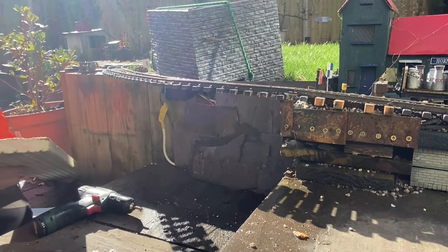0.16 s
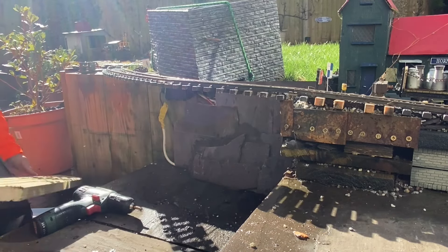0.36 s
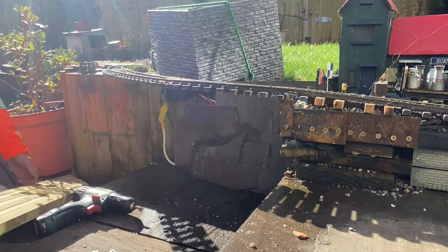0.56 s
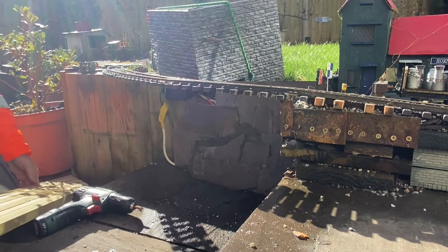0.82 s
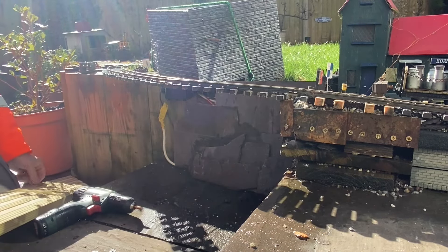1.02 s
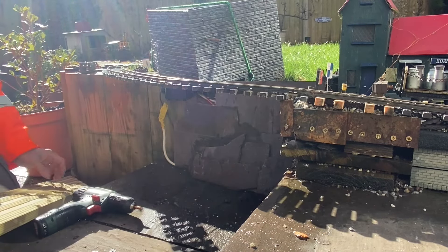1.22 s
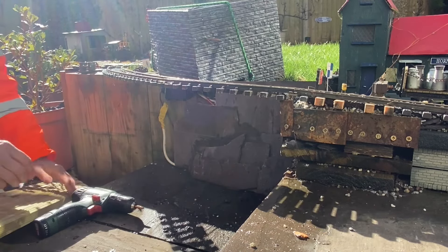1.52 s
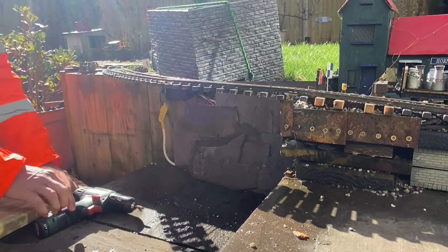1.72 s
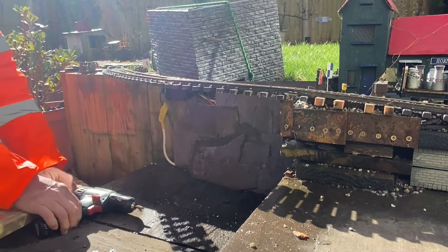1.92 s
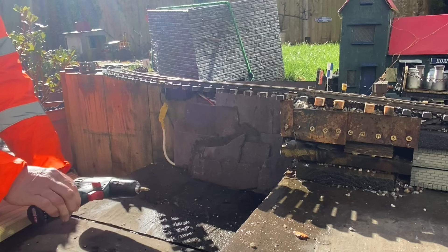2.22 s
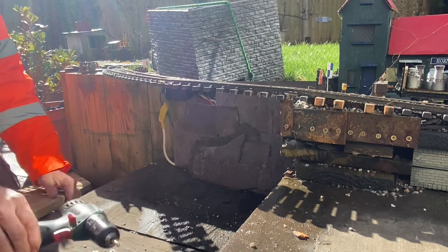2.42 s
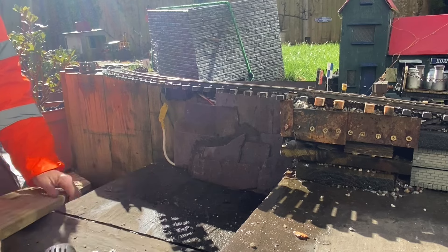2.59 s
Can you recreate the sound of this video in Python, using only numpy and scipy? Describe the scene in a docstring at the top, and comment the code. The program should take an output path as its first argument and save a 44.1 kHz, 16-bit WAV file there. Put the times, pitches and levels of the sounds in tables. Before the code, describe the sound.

Wooden boards clack and drop on garden decking, with sleeve rustle and a final heavy hollow knock

```python
"""On garden decking, timber boards are laid down and shifted, mostly to the left of the microphones.
Board edges clack, a lighter slat is tapped and a board drops and bounces: decaying sine waves plus short noise.
Soft bumps are low decaying sine waves; swishing sleeve, sliding wood, a rasp and rumble are filtered noise.
A heavy, hollow knock lands close by at the end. Echoes and a faint outdoor background are noise too."""
import sys
import numpy as np
from scipy import signal
from scipy.fft import rfft, irfft, next_fast_len
from scipy.io import wavfile
from scipy.ndimage import uniform_filter1d, minimum_filter1d

SR = 44100
rng = np.random.default_rng(int(sys.argv[2]) if len(sys.argv) > 2 else 0)


def waveform_to_disk(signal):
    """Save audio, clipped to [-1, 1], as 16-bit WAV at the path in sys.argv[1]."""
    frames = np.transpose(np.atleast_2d(signal))
    scaled = np.clip(frames, -1, 1) * 32767
    samples = np.round(scaled).astype(np.int16)
    wavfile.write(sys.argv[1], SR, samples)


N = 121275
T = np.arange(N) / SR

# sharp noise of rough wood faces meeting: (frequency [Hz], level [dB])
CRACK_SPECTRUM = [(200, -31), (600, 5.5), (1500, 12), (3500, 11), (7000, 4.5), (12000, -5.5), (15000, -22)]
# dull noise of wood meeting wood: (frequency [Hz], level [dB])
THUD_SPECTRUM = [(80, -3), (200, 9), (450, 10), (900, 3.5), (1500, 2), (2300, -9), (3500, -27),
                 (12000, -30)]
LAG_S = 0.00011  # how much later most wood sounds reach the right side


def amp(db):
    """Turn decibels into a gain."""
    return 10 ** (np.asarray(db) / 20)


def curve(rows):
    """Draw a gain over time through (time [s], level [dB]) points."""
    return amp(np.interp(T, *np.array(rows).T))


def colour(x, points):
    """Make each frequency louder or softer, following (frequency [Hz], level [dB]) points."""
    hz, db = np.array(points).T
    size = next_fast_len(N + SR // 10, True)
    f = np.maximum(np.fft.rfftfreq(size, 1 / SR), 1)
    gain = amp(np.interp(np.log(f), np.log(hz), db))
    return irfft(rfft(x, size) * gain, size)[..., :N]


def tilt(x, corner_hz, db_per_octave):
    """Brighten or dull the sound over three octaves above the corner; higher up the change stays level."""
    return colour(x, [(corner_hz, 0), (corner_hz * 2 ** 3, 3 * db_per_octave)])


def delay(x, s):
    """Start the same sound s seconds later."""
    k = int(np.clip(round(s * SR), 0, N - 1))
    return np.concatenate([np.zeros_like(x[..., :k]), x[..., :N - k]], axis=-1)


def place(x, pan_db, lag_s):
    """Place a sound in stereo: left is pan_db louder than right, and right hears it lag_s later."""
    return np.array([x * amp(pan_db / 2), delay(x, lag_s) * amp(-pan_db / 2)])


def noise(points, shared, pan_db=0, lag_s=0):
    """Make coloured stereo noise of average strength (rms) 1, partly common to both sides."""
    w = rng.standard_normal((3, N))
    common = np.sqrt(shared) * place(w[0], pan_db, lag_s)
    separate = np.sqrt(1 - shared) * w[1:]
    x = colour(common + separate, points)
    return x / np.std(x)


def fade(t, t60):
    """Die away by 60 dB in t60 seconds."""
    return np.exp(-np.log(1000) * t / t60)


def ring(hz, t60, rise_s):
    """Ring one mode, a natural vibration of the wood: a sine wave builds up and dies away."""
    t = T[:N // 4]
    y = np.sin(2 * np.pi * hz * t) * (1 - np.exp(-t / rise_s)) * fade(t, t60)
    return np.pad(y, (0, N - len(t)))


def burst(decay_s):
    """Shape the loudness of a short rough contact: a quick rise, then a fall."""
    rise_s = 0.0029
    return (1 - np.exp(-T / rise_s)) * np.exp(-np.minimum(T / decay_s, 20))


def blows(events, modes, pan_db, crack_db, thud_db):
    """Each blow rings the wood's modes while rough faces crack and thud; its brightness tilts the treble."""
    rise_s, thud_decay_s = 0.0046, 0.026
    body = 0
    for k, (hz, db, t60) in enumerate(modes):
        sign = (-1) ** k  # every second mode starts by swinging the other way
        body = body + sign * amp(db) * ring(hz, t60, rise_s)
    body = place(body, pan_db, LAG_S)
    crack = amp(crack_db) * noise(CRACK_SPECTRUM, shared=0.48, lag_s=LAG_S)
    thud = amp(thud_db) * noise(THUD_SPECTRUM, shared=0.38, pan_db=pan_db, lag_s=LAG_S)
    out = 0
    for s, db, brightness, scuff_s in events:
        hit = delay(body, s)
        hit = hit + thud * delay(burst(thud_decay_s), s)
        hit = hit + crack * delay(burst(scuff_s), s)
        out = out + amp(db) * tilt(hit, 700, brightness)
    return out


def edge_sounds(events, modes):
    """Clacks and taps share one balance: strong cracking noise beside the ringing wood."""
    return blows(events, modes, pan_db=2.5, crack_db=18.0, thud_db=-12.5)


def edge_clacks():
    """Board edges clack together, and the loose board rings."""
    # modes of a loose board: (frequency [Hz], level [dB], time to fall 60 dB [s])
    board_modes = [(655, 8.5, 0.057), (1110, 7.5, 0.082), (1466, 3, 0.066), (1890, -6, 0.048),
                   (2236, 6, 0.041), (2484, 9.5, 0.021), (2860, -0.5, 0.064), (3060, 5, 0.018),
                   (3890, 9, 0.053), (4200, -14, 0.024), (5830, 2, 0.053), (6830, 4.5, 0.028)]
    # clacks: (time [s], level [dB], brightness [dB per octave], decay of the scuffing noise [s])
    clacks = [(.031, -43.5, -6.5, 0.0042), (.038, -74.5, 8.5, 0.0029), (.173, -44, 2.5, 0.0021),
              (.1762, -39.5, 2.5, 0.0032), (.7395, -56, -3.5, 0.00071), (1.8712, -59.5, 7, 0.0021),
              (2.356, -45.5, -3, 0.0017), (2.3905, -59.5, 3, 0.0021)]
    return edge_sounds(clacks, board_modes)


def slat_taps():
    """A lighter slat is tapped and rings in its own modes."""
    # modes of the slat: (frequency [Hz], level [dB], time to fall 60 dB [s])
    slat_modes = [(647, 8, 0.064), (949, 4.5, 0.063), (1715, 13.5, 0.028), (2720, 10.5, 0.041),
                  (4750, 0, 0.059), (7700, 4, .02)]
    # taps: (time [s], level [dB], brightness [dB per octave], decay of the scuffing noise [s])
    taps = [(.3365, -49, 2, 0.0026), (2.3485, -43.5, -8.5, 0.011), (2.5188, -48.5, -5, 0.0028)]
    return edge_sounds(taps, slat_modes)


def board_landings():
    """A board meets the deck and rings as it lies there, with less cracking noise than the edges."""
    # modes of a board lying on the deck: (frequency [Hz], level [dB], time to fall 60 dB [s])
    lying_modes = [(476, 0, 0.056), (641, -1, 0.028), (773, -0.5, 0.036), (837, -7, 0.033),
                   (1519, -11.5, 0.061), (1980, -14.5, 0.03), (2530, -2.5, 0.025), (3060, -15, 0.021),
                   (3810, -9, 0.017)]
    # landings: (time [s], level [dB], brightness [dB per octave], decay of the scuffing noise [s])
    landings = [(.4875, -16.5, -2, 0.0046), (.5308, -28, -4, 0.0027), (1.482, -35.5, -4, 0.0015),
                (1.801, -38.5, -8, 0.014), (1.869, -40.5, -2, 0.0024)]
    return blows(landings, lying_modes, pan_db=5.5, crack_db=0.5, thud_db=-17.0)


def heavy_knock():
    """A blunt blow on the nearest plank: low bending waves arrive last and build slowly."""
    # modes of the near plank: (frequency [Hz], level [dB], time to fall 60 dB [s], left minus right [dB])
    plank_modes = [(185, -12.5, 0.076, 2.5), (244, -7, 0.04, 5), (385, -7.5, 0.059, 13.5),
                   (566, -7, 0.022, -12), (660, -5.5, 0.017, 30), (775, -1, 0.02, 6.5), (817, 1, 0.028, 16),
                   (1325, -14, 0.034, 9), (1470, -21.5, 0.023, -6), (2190, -24, 0.013, 5),
                   (3300, -51, 0.018, 2)]
    # the knock and its bounce: (time [s], level [dB], brightness [dB per octave])
    knocks = [(2.692, -3, 2), (2.7253, -20.5, -7)]
    bending_s = 0.0042  # travel time of a 1 kHz bending wave along the plank
    build_cycles, lag_cycles = 0.9, 0.16  # build-up time and lag of the right side, in cycles of each mode
    body = 0
    for hz, db, t60, pan_db in plank_modes:
        mode = place(ring(hz, t60, build_cycles / hz), pan_db, lag_cycles / hz)
        body = body + amp(db) * delay(mode, bending_s * np.sqrt(1000 / hz))
    thud = amp(-17.5) * noise(THUD_SPECTRUM, shared=0.23, pan_db=-7, lag_s=0.00026)
    crack = amp(-40.5) * noise(CRACK_SPECTRUM, shared=0)
    hit = body + delay((thud + crack) * burst(decay_s=0.0067), bending_s)
    return sum(amp(db) * tilt(delay(hit, s), 400, brightness) for s, db, brightness in knocks)


def bumps():
    """Soft pushes move the deck for a few slow cycles, each at its own pitch."""
    # pushes: (time [s], level [dB], pitch [Hz], time to fall 60 dB [s])
    pushes = [(0.033, -19.5, 256.4, 0.04), (0.149, -32.5, 73, 0.059), (0.498, -22.5, 115, 0.071),
              (0.534, -35.5, 330, 0.063), (0.562, -39, 94, 0.23), (0.686, -34, 87, 0.053),
              (0.726, -36.5, 170, 0.041), (1.171, -29.5, 82, 0.065), (1.292, -26.5, 106, 0.077),
              (1.482, -39, 70, 0.08), (1.488, -27, 175, 0.031), (1.497, -34.5, 354, 0.069),
              (1.854, -21.5, 171, 0.018), (2.226, -39.5, 78, 0.43), (2.287, -33, 133, 0.085),
              (2.358, -34, 76, 0.12), (2.361, -33, 161, 0.041), (2.398, -45, 109, 0.12),
              (2.465, -33.5, 114, 0.083), (2.492, -33.5, 76, 0.15)]
    x = sum(amp(db) * delay(ring(hz, t60, rise_s=0.0018), s) for s, db, hz, t60 in pushes)
    return place(x, 3, LAG_S)


def grain(size, depth_db):
    """Uneven grip: smoothed random noise makes the level flicker."""
    w = uniform_filter1d(uniform_filter1d(rng.standard_normal(N), size), size)
    return amp(depth_db * w / np.std(w))


def sleeve_swish():
    """Sleeve fabric swishes: filtered noise swells and fades with a fine flicker."""
    # sound of the fabric: (frequency [Hz], level [dB])
    fabric_spectrum = [(200, 4), (1100, 5.5), (2000, 1.5), (3200, 4.5), (5600, 4.5), (6800, 6), (9000, 2.5),
                       (12000, -2), (14000, -8), (15000, -43)]
    # loudness of the swish: (time [s], level [dB])
    swish_level = [(0, -57.5), (.11, -59), (.21, -51), (.32, -60), (.43, -58.5), (.53, -50.5), (.6, -63),
                   (1.05, -67), (1.22, -52.5), (1.38, -52.5), (1.5, -47), (1.65, -46.5), (1.8, -53),
                   (2.0, -57.5), (2.31, -65), (2.36, -52.5), (2.45, -57), (2.55, -53)]
    fabric = noise(fabric_spectrum, shared=0.27, lag_s=.00028)
    return fabric * curve(swish_level) * grain(size=200, depth_db=0.98)


def sliding_board():
    """A board slides under the hand: duller noise whose level flickers with the grip."""
    # sound of wood sliding on wood: (frequency [Hz], level [dB])
    slide_spectrum = [(100, 4), (350, 8.5), (1400, 9.5), (3000, -8.5), (6000, -46), (14000, -64)]
    # loudness of the sliding: (time [s], level [dB])
    slide_level = [(0, -56.5), (1.1, -60.5), (1.25, -55), (1.55, -62.5), (1.65, -46.5), (1.76, -53.5),
                   (1.83, -53.5), (1.95, -57.5), (2.4, -61), (2.54, -59.5), (2.75, -44)]
    wood = noise(slide_spectrum, shared=0.39, pan_db=1.5, lag_s=0.00035)
    return wood * curve(slide_level) * grain(size=150, depth_db=1.5)


def chafe():
    """Wood chafes on wood as the board is nudged: a narrow band of noise makes a short rasp."""
    middle_s, half_s, hz = 2.14, .08, 1245
    band = [(hz / 2, -45), (hz * .86, -14), (hz, 0), (hz * 1.16, -14), (hz * 2, -45)]
    swell = np.exp(-((T - middle_s) / half_s) ** 2)
    return amp(-59) * swell * noise(band, shared=0.57, lag_s=LAG_S)


def deck_rumble():
    """The deck rumbles under shifting weight: low noise, mostly the same on both sides."""
    # sound of the rumble: (frequency [Hz], level [dB])
    rumble_spectrum = [(20, -39), (55, 5), (95, 0.5), (170, -6.5), (350, -16), (700, -33), (2000, -74)]
    # loudness of the rumble: (time [s], level [dB])
    rumble_level = [(0, -47.5), (.42, -62), (.56, -49.5), (.82, -56), (.95, -51), (1.4, -55), (1.65, -48),
                    (1.95, -52.5), (2.15, -59), (2.45, -42.5), (2.6, -56)]
    return noise(rumble_spectrum, shared=0.85) * curve(rumble_level)


def surroundings(x, echo_db):
    """Decking and fences scatter the sound: a fading noise tail adds many tiny echoes."""
    # colour of the echoes: (frequency [Hz], level [dB])
    echo_spectrum = [(60, -6), (300, 7), (1500, -2.5), (5000, -28), (14000, 4)]
    tail = noise(echo_spectrum, shared=0.033) * fade(T, 0.26) * (1 - np.exp(-T / 0.0015))
    tail = tail / np.sqrt(np.sum(tail ** 2) / 2)  # average energy of the two sides is 1
    return x + amp(echo_db) * signal.fftconvolve(x, tail, axes=1)[:, :N]


def garden():
    """The faint outdoor background is steady, mostly low noise."""
    # sound of the garden: (frequency [Hz], level [dB])
    garden_spectrum = [(25, 9), (60, 22.5), (150, -5.5), (300, 8.5), (550, -4), (1150, -0.5), (2000, -49),
                       (7000, -44), (14000, -58)]
    return amp(-56.5) * noise(garden_spectrum, shared=0.068)


def scene():
    """Add up all the wood sounds, the handling and the garden."""
    wood = edge_clacks() + slat_taps() + board_landings() + bumps()
    struck = surroundings(wood, echo_db=-12.5) + surroundings(heavy_knock(), echo_db=-19.5)
    handling = sleeve_swish() + sliding_board() + chafe() + deck_rumble()
    return struck + handling + garden()


def record(dry):
    """The microphone pair colours what both sides share; a limiter holds peaks and the top is cut."""
    # response to the shared part: (frequency [Hz], level [dB])
    shared_response = [(30, -1), (7600, 0), (8300, -7.5), (8800, -44), (9400, -25), (10000, -3),
                       (11000, 2.5), (15000, 7.5)]
    mid = colour((dry[0] + dry[1]) / 2, shared_response)
    side = (dry[0] - dry[1]) / 2
    x = np.array([mid + side, mid - side])
    gain = np.minimum(1, .95 / (np.abs(x) + 1e-9))
    # spread each dip over 131 samples (3 ms) so that the gain moves smoothly
    x = x * uniform_filter1d(minimum_filter1d(gain, size=131), size=131)
    top_cut = signal.ellip(8, .2, 80, 14700, fs=SR, output="sos")  # low-pass at 14700 Hz
    return signal.sosfilt(top_cut, x)


dry = scene()
out = record(dry)
waveform_to_disk(out)
```